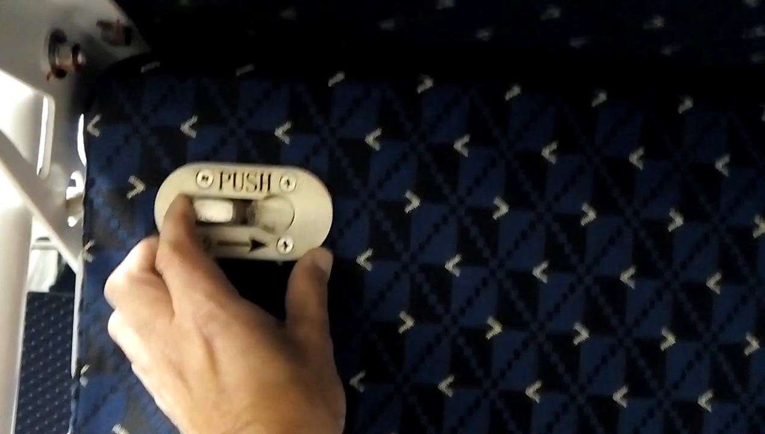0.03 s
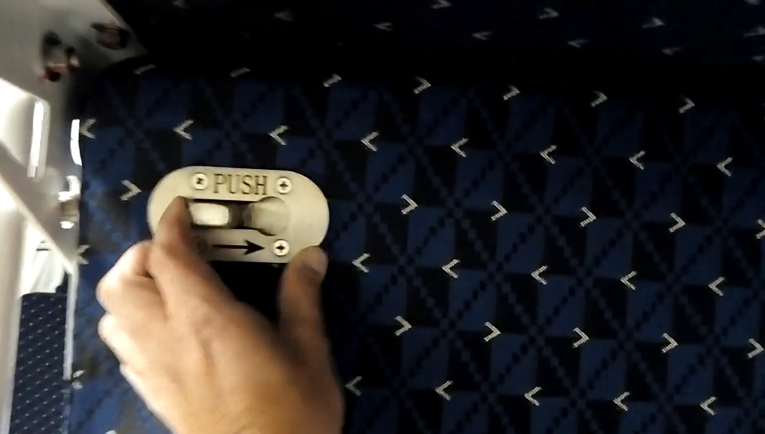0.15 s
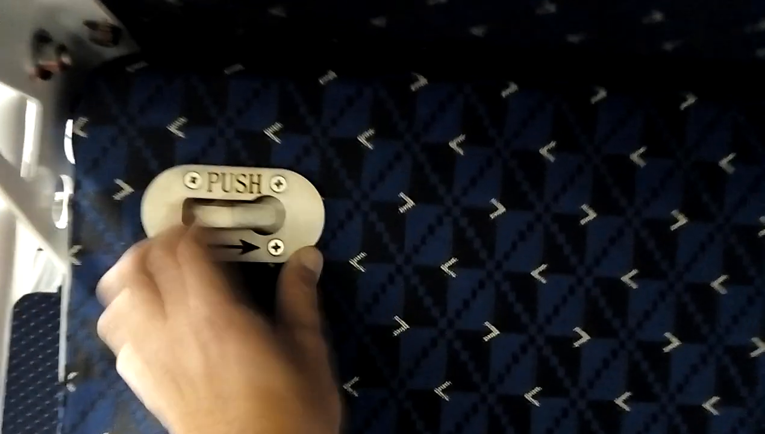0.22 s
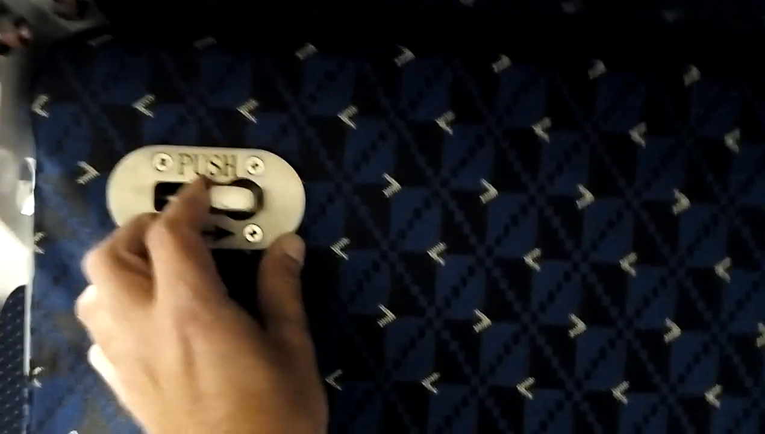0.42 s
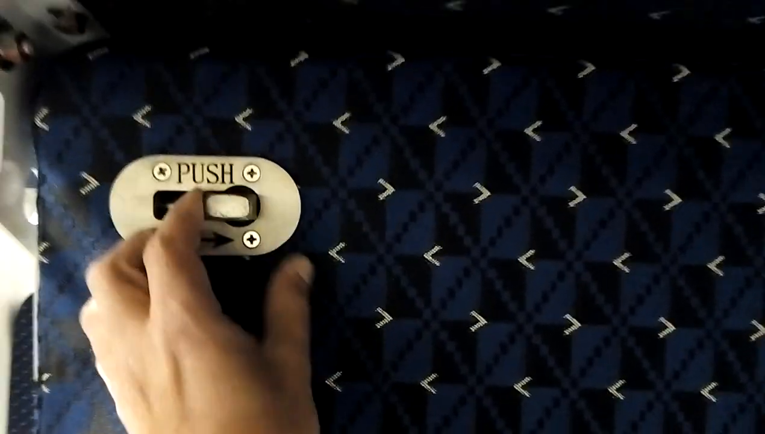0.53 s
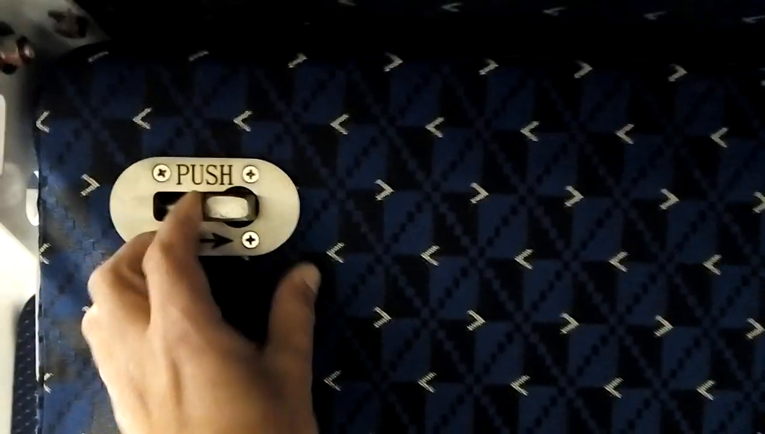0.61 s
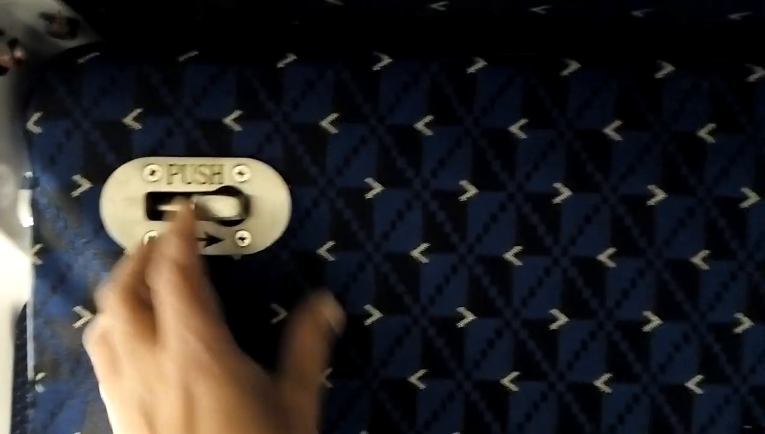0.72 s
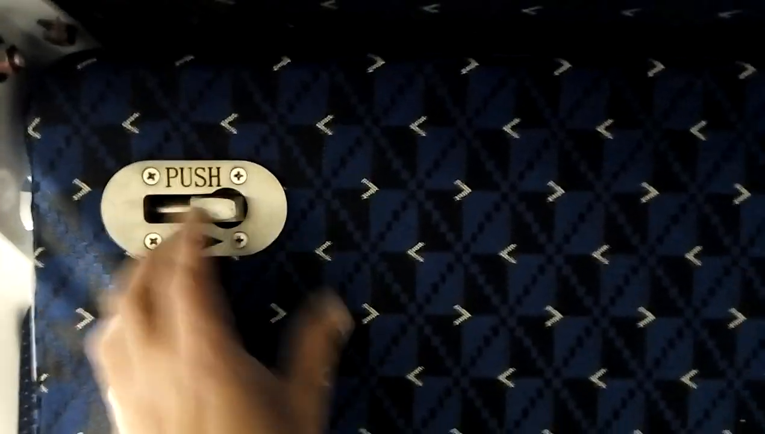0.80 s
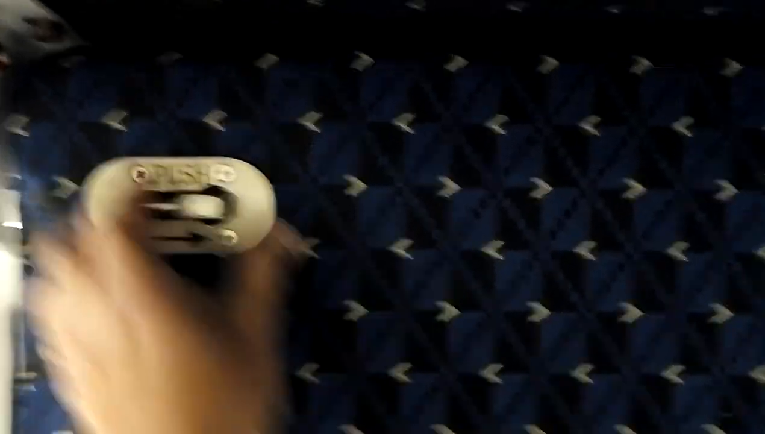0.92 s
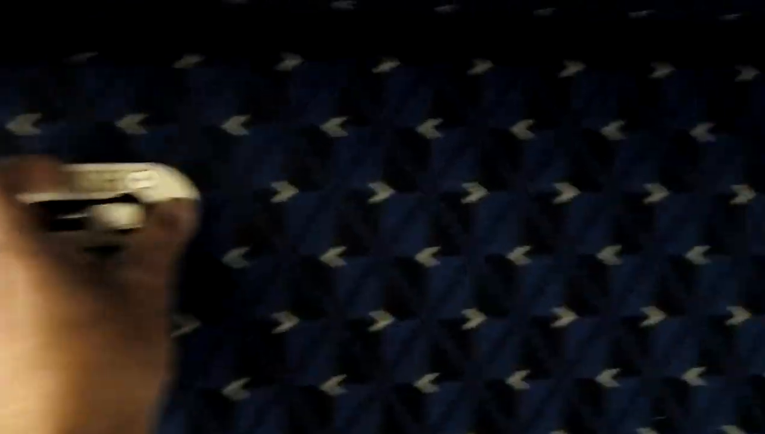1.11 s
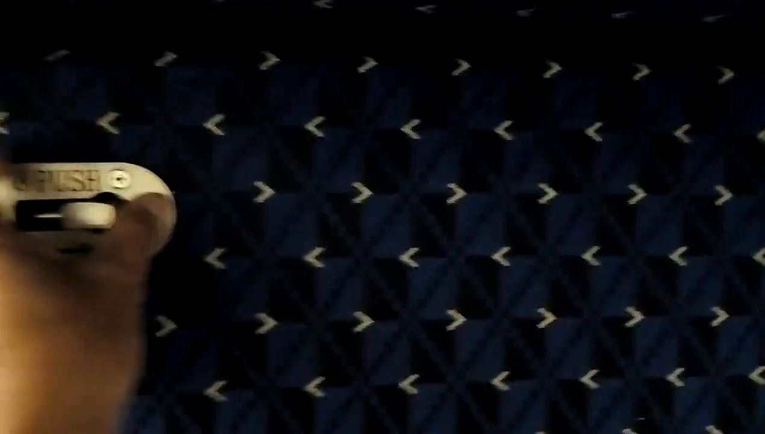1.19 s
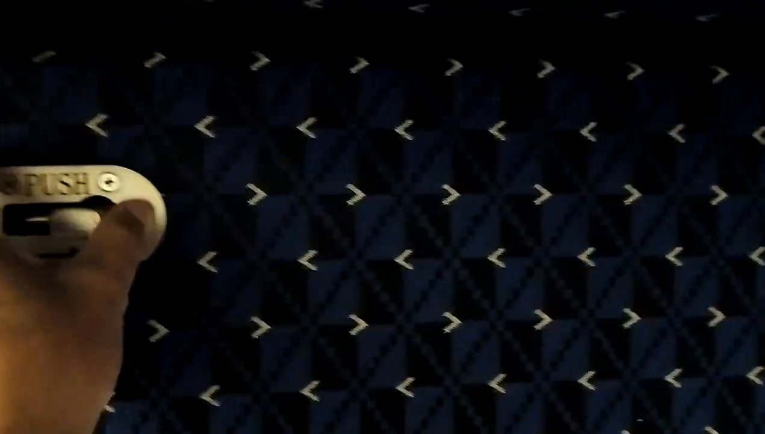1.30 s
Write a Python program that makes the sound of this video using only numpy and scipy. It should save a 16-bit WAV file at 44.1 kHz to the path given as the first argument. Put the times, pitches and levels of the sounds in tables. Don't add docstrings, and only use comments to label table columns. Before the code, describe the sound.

Sharp double clack of a sprung plastic latch, brief rattle, then light rubbing and a small click

```python
import sys
import numpy as np
from scipy import signal
from scipy.fft import rfft, irfft, next_fast_len
from scipy.io import wavfile
from scipy.ndimage import uniform_filter1d, map_coordinates

SR = 44100
rng = np.random.default_rng(int(sys.argv[2]) if len(sys.argv) > 2 else 0)


def volts_from_decibels(level):
    exponent = np.asarray(level, float) / 20
    return 10 ** exponent


def master_out(mix):
    frames = np.transpose(np.atleast_2d(mix))
    ceiling = np.clip(frames, -1, 1)
    pcm = np.round(ceiling * 32767).astype(np.int16)
    wavfile.write(sys.argv[1], SR, pcm)


N = 59535


def unit(x):
    return x / np.sqrt(np.mean(x ** 2) + 1e-20)


def along(points, hz):
    f, v = np.transpose(points)
    return np.interp(np.log(hz + 1), np.log(f + 1), v)


def wobble(rate):
    knots = rng.standard_normal(int(N * rate / SR) + 4)
    return map_coordinates(knots, [np.arange(N) * rate / SR])


def coloured(x, level_db):
    m = 2 * next_fast_len(len(x) // 2 + 4096)
    level = np.maximum(level_db(np.fft.rfftfreq(m, 1 / SR)), -110)
    cepstrum = irfft(np.log(volts_from_decibels(level)), m)
    cepstrum[1:m // 2] *= 2
    cepstrum[m // 2 + 1:] = 0
    return irfft(rfft(x, m) * np.exp(rfft(cepstrum)), m)[:len(x)]


def patchy(depth_db):
    z = signal.stft(rng.standard_normal(N), nperseg=512)[2]
    field = uniform_filter1d(rng.standard_normal(z.shape), size=4, axis=0)
    field = uniform_filter1d(field, size=8, axis=1)
    return signal.istft(z * volts_from_decibels(depth_db * unit(field)), nperseg=512)[1][:N]


# pitch in Hz, level in dB.
AIR_TONE = [(800, -38.5), (980, -23), (1070, -5), (1450, 0), (1750, -3.5), (2900, -3), (5200, -10),
            (6600, -21), (7500, -39), (9000, -58.5)]
# pitch in Hz, level in dB.
RUMBLE_TONE = [(15, -53.5), (25, -33), (210, -6.5), (257, -8.5), (291, -11), (601, -10), (1000, -13.5),
               (1300, -42), (2200, -120)]
# pitch in Hz, level in dB.
HISS_TONE = [(4120, -30.5), (7000, -7), (8150, -7.5), (13500, -10.5), (14900, 0.5), (16000, -1)]
# pitch in Hz, width in Hz, boost in dB.
DUCT_HUMS = [(610.72, 30, 8), (1081.9, 70.56, 6), (1427.4, 160, 1.5), (1573.3, 58.2, 7.5), (2406, 26, -5.5)]
# time in seconds, level in dB.
AIRFLOW = [(0.0, -59.5), (0.378, -56.5), (0.68, -58), (0.954, -59), (1.124, -56.5), (1.35, -57)]


def carriage():
    def hums(hz):
        return sum(db / (1 + ((hz - c) / w * 2) ** 2) for c, w, db in DUCT_HUMS)

    air = unit(coloured(patchy(depth_db=2.5), lambda hz: along(AIR_TONE, hz) + hums(hz)))
    rumble = unit(coloured(patchy(depth_db=1.5), lambda hz: along(RUMBLE_TONE, hz) + hums(hz)))
    hiss = unit(coloured(rng.standard_normal(N), lambda hz: along(HISS_TONE, hz)))
    air_db = np.interp(np.arange(N) / SR, *np.transpose(AIRFLOW)) + 0.6 * wobble(7.61)
    rumble_db = -72 + 0.94 * wobble(9.047)
    return volts_from_decibels(air_db) * air + volts_from_decibels(rumble_db) * rumble + volts_from_decibels(-78.5) * hiss


# start in seconds, length in seconds, pitch in Hz, level in dB.
SQUEAKS = [
    (1.082, 0.02309, 9046, -59),
    (1.107, 0.0109, 9111, -59.5),
    (1.126, 0.01748, 8950, -73),
    (1.147, 0.00889, 9516, -62),
]


def squeaks():
    wander_hz, fade_s = 59.72, 0.002214
    t = np.arange(N) / SR
    drift = np.cumsum(wander_hz * wobble(305)) / SR
    out = np.zeros(N)
    for start, length, hz, db in SQUEAKS:
        fade = np.clip(np.minimum(t - start, start + length - t) / fade_s, 0, 1)
        out += volts_from_decibels(db) * np.sqrt(2) * fade * np.sin(2 * np.pi * (hz * t + drift))
    return out


# time in seconds, level in dB, low body sound in dB, treble in dB.
CREEP = [
    (.15, -66.5, 0, -17),
    (.16, -57.5, -8.5, -14),
    (.172, -69.5, -2, -16.5),
    (.188, -65, -3.5, -15),
    (.213, -48, -10, -22.5),
    (.224, -46, -15.5, -10),
    (.2305, -37.5, -9.5, -13.5),
    (.236, -81.5, -11, 0.5),
]
RUB = [
    (.928, -65.5, -19, -11.5),
    (.942, -54, -16.5, -4),
    (.968, -52.5, -16, -7.5),
    (.985, -57.5, -13, -15),
    (1.048, -61, -19, -11),
    (1.07, -68, -21.5, 3),
]
DRAG = [
    (1.071, -64.5, -20, -4),
    (1.0755, -39, -26.5, 0),
    (1.09, -38.5, -19, 3.5),
    (1.11, -38.5, -11.5, -4.5),
    (1.138, -41.5, -5.5, -7),
    (1.156, -38, -10.5, 10),
    (1.19, -44.5, -9, 7),
    (1.222, -52, -9.5, -5),
    (1.3, -68, -5.5, -6),
]
# pitch in Hz, level in dB.
SCRAPE_TONE = [(500, -36.5), (900, -7), (1500, -7.5), (3600, 4), (6300, -3), (7300, -13), (8200, -23),
               (12500, -40.5), (14900, -28.5), (16000, -32.5)]
# pitch in Hz, level in dB.
BODY_TONE = [(29, -70.5), (60, -34), (194, -1.5), (296, -8), (534, -2), (1000, -3.5), (1300, -39),
             (2200, -120)]


def friction(stroke, thin_db=0):
    slips_per_s, slip_spread_db, smooth_share = 6300, 2, 0.691
    thin_below_hz, treble_hz = 2900, 8111
    s, level_db, body_db, treble_db = np.transpose(stroke)

    def at(values, outside):
        return np.interp(np.arange(N) / SR, s, values, left=outside, right=outside)

    slips = (rng.random(N) < slips_per_s / SR) * rng.choice([-1, 1], N)
    slips = slips * volts_from_decibels(slip_spread_db * rng.exponential(size=N))
    grit = (1 - smooth_share) * unit(slips) + smooth_share * rng.standard_normal(N)
    scrape = unit(coloured(grit, lambda hz: along(SCRAPE_TONE, hz) + thin_db / (1 + (hz / thin_below_hz) ** 8)))
    hz = np.fft.rfftfreq(N, 1 / SR)
    treble = irfft(rfft(scrape) / (1 + (treble_hz / (hz + 1)) ** 12), N)
    body = unit(coloured(patchy(depth_db=-1.5), lambda hz: along(BODY_TONE, hz)))
    body_gain = volts_from_decibels(at(body_db, -60) + 2.306 * wobble(40.431))
    mix = scrape + (volts_from_decibels(at(treble_db, 0)) - 1) * treble + body_gain * body
    return volts_from_decibels(at(level_db, -150) + 0.8036 * wobble(89.562)) * mix


# start in
# seconds, pitch in Hz, level in dB, time to fall 60 dB in seconds.
SLIP_TICKS = [(.1575, 5300, -58, .02), (.1575, 2810, -50, .029), (.167, 486, -48, .034),
              (.1672, 3580, -41.5, .03), (.174, 475, -55.5, .07), (.186, 496, -48, .061),
              (.30, 5226, -51, .3), (.936, 6430, -61, .09), (.9385, 3716, -54, .1), (.943, 3800, -53, .04),
              (.945, 4700, -56, .04), (.955, 850, -63, .25), (.95, 3600, -53, .05), (.95, 5800, -57, .08),
              (.962, 4520, -53, .05), (1.083, 808, -49, .11), (1.102, 203, -49, .077),
              (1.167, 610, -47, .06)]
# start in seconds, pitch in Hz, level in dB, time to fall 60 dB in seconds.
KNOCKS = [(.2262, 3600, -34, .016), (.2314, 2450, -5.5, .008), (.2316, 1100, -17, .012),
          (.2328, 5700, -12, .01), (.2328, 3500, -12, .012), (.234, 395, -26, .12),
          (.2428, 14800, -38, .016), (.2429, 4460, -9, .014), (.2431, 2050, -7, .016),
          (.244, 675, -35, .14), (.244, 835, -32, .12), (.2443, 1430, -16, .05), (.2445, 3600, -12.5, .035),
          (.2455, 5810, -20, .04), (.2505, 2790, -22, .07), (.258, 3750, -22.5, .084),
          (.266, 3300, -24, .035), (.272, 5226, -31.5, .13), (.279, 1350, -38, .13),
          (.281, 2250, -27, .035), (.285, 3700, -33, .12), (.285, 2800, -34, .1), (.3217, 800, -32, .017),
          (.3232, 2180, -31, .03), (.326, 1350, -36, .04), (.327, 3720, -36, .03), (.3272, 2610, -31, .025),
          (.3325, 2400, -32, .025), (.348, 2860, -43, .03), (1.3353, 2740, -30, .025),
          (1.3354, 1440, -41, .05), (1.3354, 4810, -37, .019), (1.3357, 2050, -33, .015),
          (1.3359, 3900, -35, .018), (1.3364, 3280, -24, .013), (1.3405, 2330, -30, .012),
          (1.3407, 3250, -31, .016), (1.3432, 2740, -37, .02)]


def ticks_and_knocks():
    wander_hz, rise_s = 30, 0.0006
    t = np.arange(N) / SR
    drift = np.cumsum(wander_hz * wobble(350)) / SR

    def rings(rows):
        out = np.zeros(N)
        for start, hz, db, t60 in rows:
            fall = volts_from_decibels(db - 60 * np.maximum(t - start, 0) / t60)
            rise = np.clip((t - start) / rise_s, 0, 1) ** 2
            out += fall * rise * np.sin(2 * np.pi * (hz * (t - start) + drift * hz / 5000))
        return out

    return rings(SLIP_TICKS) + coloured(rings(KNOCKS), lambda hz: -40 / (1 + (hz / 300) ** 4))


# pitch in Hz, time to fall 60 dB in seconds.
RATTLE_T60 = [(150, 0.4687), (600, 0.08588), (2500, 0.15585), (6000, 0.14411), (12000, 0.08696)]


def seat_rattle(count):
    hz, t, z = signal.stft(rng.standard_normal(count), SR, nperseg=128)
    t60 = np.clip(along(RATTLE_T60, hz), .01, 1)[:, None]
    return signal.istft(z * volts_from_decibels(-60 * t / t60), SR, nperseg=128)[1][:count]


# start in seconds, peak level in dB,
# brightness in dB per octave, seat-back rattle in dB, bass in dB.
BLOWS = [(0.2313, -15, -3.5, -18, -0.5), (0.2324, -16, -0.5, -19, 2), (0.2405, -25, 0.5, -25, 0),
         (0.2428, -10, -1, -12, -4), (0.2456, -15, 2, -10, -2.5), (0.2537, -22.5, -2, -9.5, -1.5),
         (0.2586, -21, 2.5, -9.5, -4), (0.2657, -24.5, 1, -12.5, -7), (.280, -28, 2, -12, -1),
         (0.3222, -32, -1, -8, 2), (0.3275, -32, -2, -8, -4), (1.150, -37.5, 1.5, -5, 4),
         (1.3353, -36, -3, -12, -26), (1.3408, -39, -2, -5, -25)]
# pitch in Hz, level in dB.
SNAP_TONE = [(35, -83.5), (100, -40.5), (380, -19.5), (600, -15.5), (1400, -2.5), (3760, -1.5),
             (6300, -10.5), (7600, -21.5), (12500, -46), (14900, -38.5), (16000, -45)]
# pitch in Hz, level in dB, time to fall 60 dB in seconds.
SLIDE_MODES = [(394.06, -16, 0.05), (1182.8, 4, 0.04466), (1389.4, -3, 0.11495), (1517, 5.5, 0.084),
               (1981.9, -7, 0.1), (2108.5, 8, 0.04609), (2267.9, 1.5, 0.083), (2427.3, -1, 0.07),
               (2828, -4, 0.1913), (3622.8, 0.5, 0.12755), (3875, 4, 0.051), (4480.6, -8, 0.12),
               (5259.1, -5, 0.078), (5795.2, 0.5, 0.07177)]


def blows():
    crack_t60_s, crack_rise_s, rattle_rise_s, ring_rise_s = 0.013346, 0.0002885, 0.0008125, 0.00051
    ring_db, bass_hz, lumps_db = -7, 931.2, 3
    dulling, dull_hz = 0.6684, 6736
    t = np.arange(SR // 2) / SR
    out = np.zeros(N + SR)
    for start, db, tilt, rattle_db, bass_db in BLOWS:
        def change(hz):
            bright = tilt * np.log2((hz + 50) / 3000)
            bass = bass_db / (1 + (hz / bass_hz) ** 4)
            return bright + bass + dulling * (db + 13.5) / (1 + (dull_hz / (hz + 1)) ** 8)

        def tone(hz):
            return along(SNAP_TONE, hz) + change(hz)

        tone_size = np.sqrt(np.sum(coloured(np.eye(1, 2000)[0], tone) ** 2))
        crack = volts_from_decibels(-60 * t / crack_t60_s) * (1 - np.exp(-t / crack_rise_s)) * rng.standard_normal(len(t))
        rattle = volts_from_decibels(rattle_db + lumps_db * wobble(402.23)[:len(t)]) * seat_rattle(len(t))
        rattle = rattle * (1 - np.exp(-t / rattle_rise_s))
        ring = np.zeros(len(t))
        for hz, level, t60 in SLIDE_MODES:
            mode_db = level + rng.normal(0, 1.1996) + change(hz)
            ring += volts_from_decibels(mode_db - 60 * t / t60) * np.sin(2 * np.pi * (hz * t + rng.random()))
        ring *= 1 - np.exp(-t / ring_rise_s)
        blow = coloured(crack + rattle, tone) / tone_size + volts_from_decibels(ring_db + rattle_db) * ring
        out[round(start * SR):][:len(t)] += volts_from_decibels(db) * blow
    return out[:N]


def scene():
    latch = blows()
    latch += friction(CREEP)
    latch += friction(RUB, thin_db=-8)
    latch += friction(DRAG)
    latch += ticks_and_knocks()
    latch += squeaks()
    return (latch + carriage())[None]


def top_cut(x):
    return signal.sosfilt(signal.butter(12, 16450, fs=SR, output="sos"), x)


def record(dry):
    heard = np.fft.rfftfreq(N, 1 / SR) < 15700
    mix = irfft(rfft(dry) * heard, N)
    return top_cut(mix)


dry = scene()
out = record(dry)
master_out(out)
```